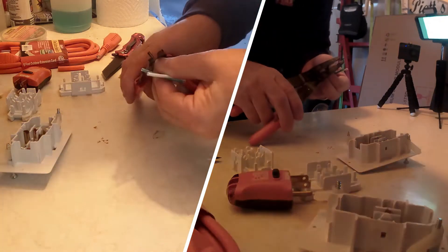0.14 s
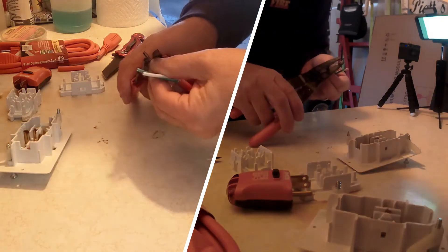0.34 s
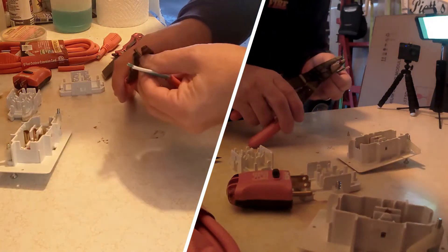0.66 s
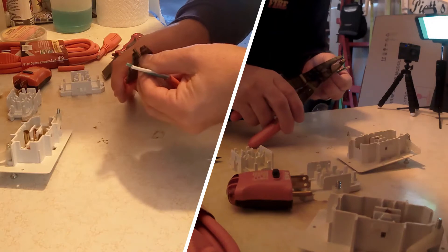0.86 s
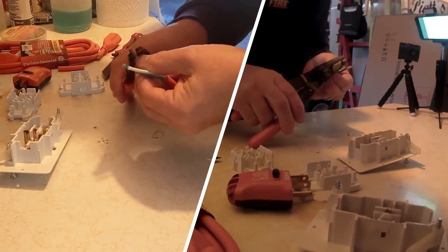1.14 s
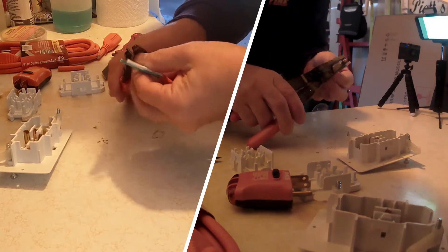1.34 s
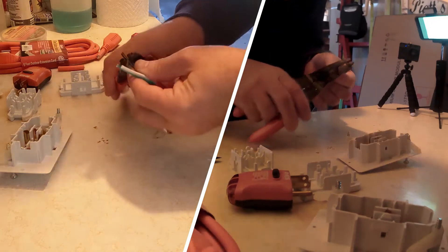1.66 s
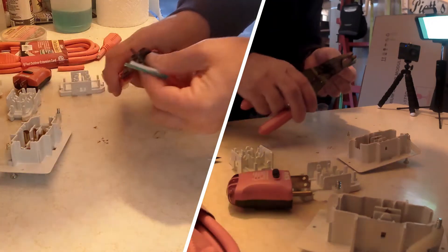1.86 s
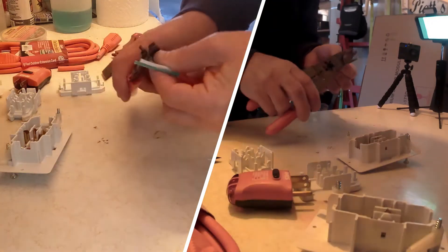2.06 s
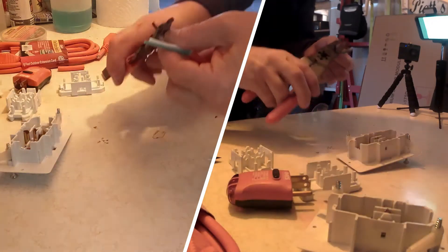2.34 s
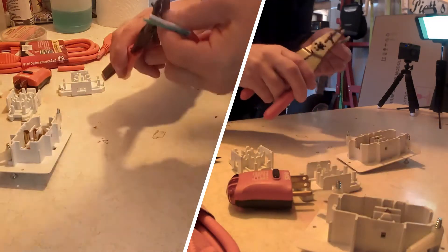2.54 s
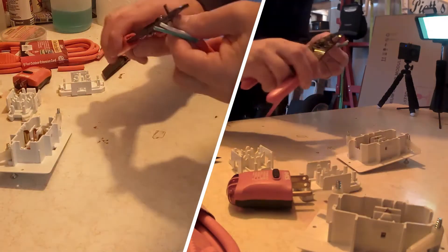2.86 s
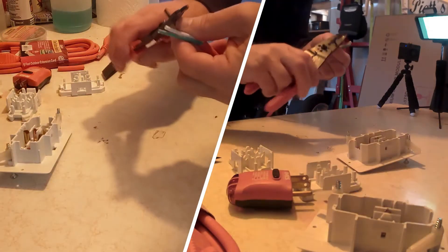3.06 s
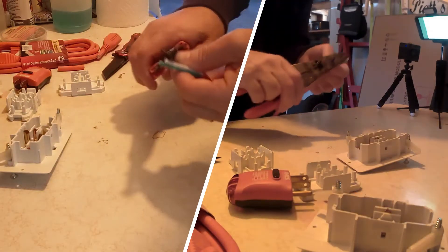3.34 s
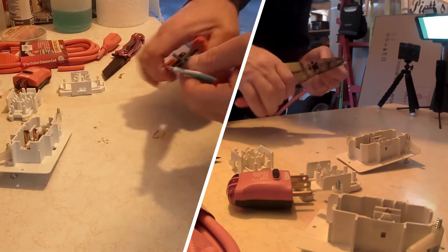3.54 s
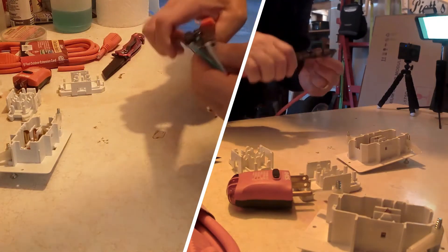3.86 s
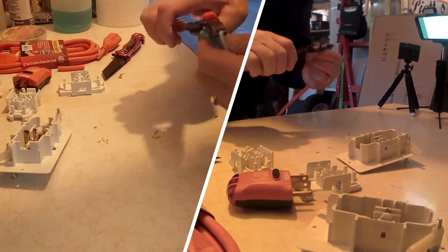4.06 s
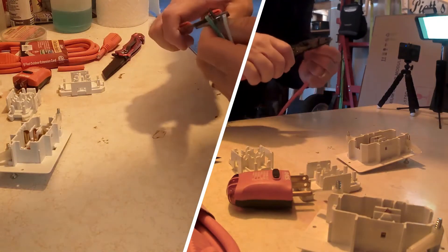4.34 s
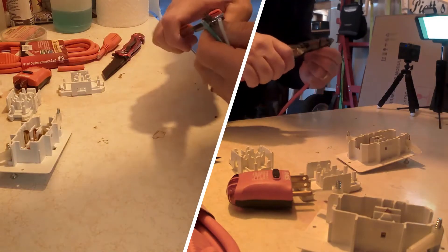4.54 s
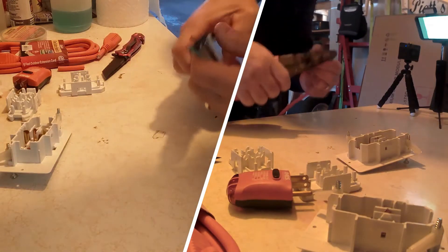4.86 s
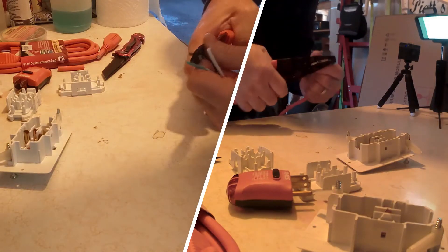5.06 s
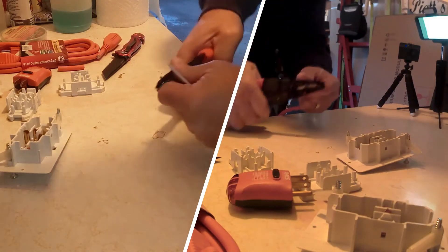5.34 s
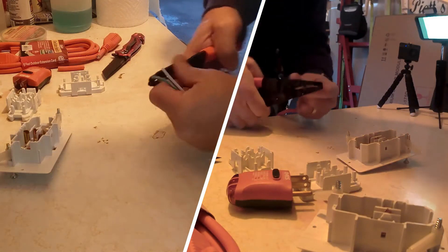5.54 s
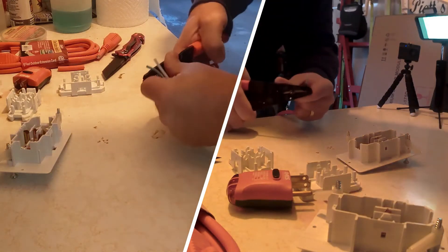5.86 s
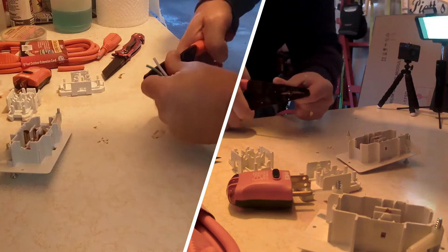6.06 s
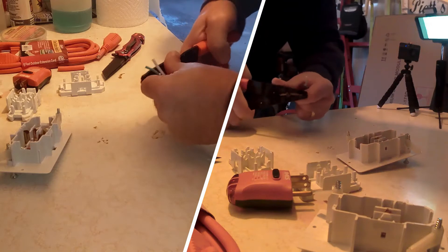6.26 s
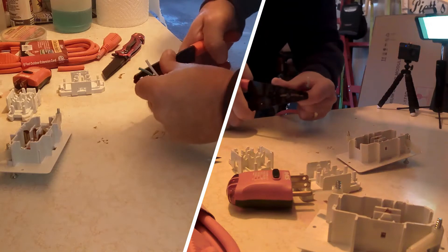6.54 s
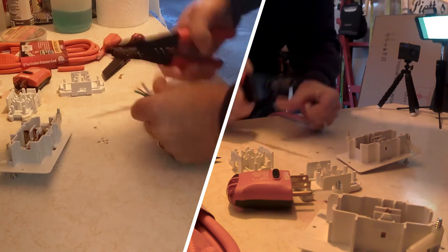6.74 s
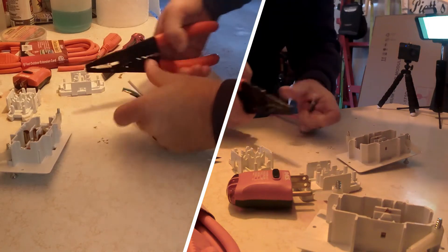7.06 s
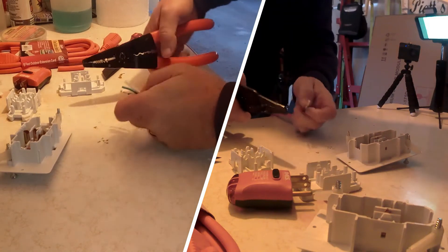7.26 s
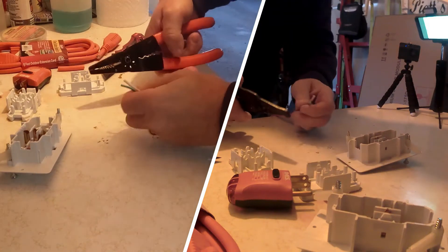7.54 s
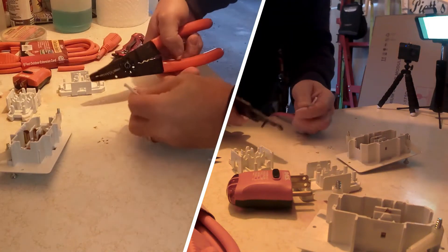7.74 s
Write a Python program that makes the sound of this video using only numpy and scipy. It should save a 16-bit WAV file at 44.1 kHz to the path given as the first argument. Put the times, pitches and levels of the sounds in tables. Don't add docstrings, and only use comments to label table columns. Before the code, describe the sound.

A small, quiet indoor room heard close in stereo, with faint hiss and a low wavering appliance hum. A tiny pivot squeak opens; a counter knock comes at 0.5 seconds, then a light tick and rub, with another knock at 1.6. Soft hollow plastic bumps sound at 2.1 and 2.3, followed by dragging sleeve rubs. Around 3.2-3.9 steel ticks mix with stronger rubbing and thin insulation hiss. From 4.5 to 4.9 the jaws bite in a quick gritty series, brighter near the end. A rub at 5.1 leads into stuttering low cable creaks and faint strand flicks until a snip at 5.7. At 6.4 two very sharp metallic snips crack close together. A brief scuff leads to a heavy, booming counter knock at 6.9, with loose parts chattering and hum swelling. Small clinks, knocks and sliding hiss fade before a last pinging snip at 7.8.

```python
import sys
import numpy as np
from scipy import signal
from scipy.fft import rfft, irfft
from scipy.io import wavfile
from scipy.ndimage import uniform_filter1d

SR = 44100
rng = np.random.default_rng(int(sys.argv[2]) if len(sys.argv) > 2 else 0)


def unload_audio(sound):
    columns = np.transpose(np.atleast_2d(sound))
    steps = np.round(np.clip(columns, -1, 1) * 32767)
    wavfile.write(sys.argv[1], SR, steps.astype(np.int16))


def linear_from_db(decibels):
    return 10 ** (np.asarray(decibels, float) / 20)


N = 348654

# start in seconds, steel peak level in dB, crack in dB above it,
# knock through the handle in dB above it, shake in seconds.
SNIPS = [
    (5.6665, -43, -10, -20, .003),
    (6.2995, -70, 5, 17, .002),
    (6.3735, -59, 20, 13, 0.0018),
    (6.3804, -36, 10.5, 3.5, .003),
    (6.413, -35, 9, -10, .002),
    (7.767, -45.5, -8, -20, .002),
]
# frequency in Hz, level in dB, t60 in seconds.
HANDLE = [(673, -1, 0.028), (1280, -5, 0.041), (1400, -7.5, .08), (2073, -9, 0.027)]
# frequency in Hz, level in dB, t60 in seconds.
STEEL = [(2678, 1, 0.023), (3256, -4, .035), (3700, -3, 0.029), (4480, -1.5, 0.033), (5330, -6, .025),
         (6100, 0, 0.025), (6900, -7, .03), (8330, -11, 0.016), (9670, -8, .025), (10270, -4, .025),
         (11200, -9, .025), (12880, -9, .02), (13940, -10, .02)]
# start in seconds, peak level in dB, frequency in Hz, t60 in seconds.
PINGS = [
    (5.667, -41.5, 3500, 0.016),
    (7.7665, -35.5, 3800, 0.01),
    (4.866, -46.5, 9800, .015),
]
# start in seconds, body peak level in dB, body frequency in Hz,
# bright band in dB above the body.
TICKS = [(0.658, -55, 2310, -23), (1.479, -50.5, 2390, -7), (1.836, -51.5, 5370, 9),
         (3.261, -52.5, 2550, -13), (3.628, -56.5, 2320, 15), (3.844, -51.5, 3070, -13),
         (3.868, -51.5, 2540, -23), (5.6658, -43, 3500, -8), (6.373, -53, 3400, -24),
         (6.381, -32.5, 2770, -2), (6.4138, -35.5, 2740, 7), (6.4614, -57, 4680, -5),
         (6.6147, -53.5, 3160, 2), (6.939, -43, 2370, -21), (7.7666, -41, 3900, -14), (7.88, -56, 5560, 13)]
# as for the ticks, in seconds, dB, Hz and dB.
CLINKS = [(1.5318, -56, 2380, -1), (2.33, -51, 6100, -5), (4.071, -53, 2550, -6), (4.6837, -48, 2550, -11),
          (4.71, -48, 4340, -9), (5.7255, -55, 2200, -20), (6.84, -59, 4580, -23), (6.882, -47, 4200, -8),
          (7.206, -57, 2280, 0), (7.2432, -55.5, 4470, -9), (7.395, -51, 3940, -4)]
# start in seconds, body peak level in dB, body frequency in Hz.
BITES = [(4.489, -57, 5330), (4.508, -59, 6500), (4.5306, -54.5, 2620), (4.566, -54, 5920),
         (4.583, -55, 4800), (4.601, -51, 2600), (4.635, -55, 4460), (4.666, -54, 2820), (4.69, -49, 2600),
         (4.722, -57, 2500), (4.732, -44, 2310), (4.7674, -44, 2580), (4.799, -52, 2700),
         (4.805, -49.5, 4330), (4.822, -52, 4700), (4.846, -50.5, 6190), (4.865, -47, 2600)]
# start in seconds, body peak level in dB.
FLICKS = [
    (5.3694, -66),
    (5.3902, -59.5),
    (5.4157, -56.5),
    (5.4346, -56),
    (5.4605, -56.5),
]
# frequency in Hz, level in dB, t60 in seconds.
SQUEAK = [(860, 4, 0.033), (2740, -8.5, 0.052), (4280, -14, .06)]
# frequency in Hz, width in Hz, level in dB.
SCUFF = [(194, 51, 13), (598, 100, 5), (1421, 120, 2), (1680, 120, 2), (3000, 600, -0.5), (4150, 270, -5),
         (6000, 500, -14), (9150, 3800, -8)]
# start in seconds, board peak level in dB, then cabinet, panel and edge
# in dB above the board.
KNOCKS = [(0.462, -39.5, -5, -8.5, -22), (0.658, -60, 6.5, -21, -9), (1.48, -54, 0, 0, -12),
          (1.613, -43, -2.5, -4, -22), (3.231, -50.5, -13, -5, 2), (5.725, -55, -7, -19, 3),
          (5.831, -69, 17, -16, -11), (6.382, -46, 0.5, -7, 2), (6.413, -42, -12, -11, -6),
          (6.881, -43.5, -13, 5, -0.5), (6.9387, -23.5, 1, -7, -17), (7.157, -60.5, 18.5, -10, -22),
          (7.271, -66, 15, -18, -3), (7.39, -55.5, 4, -14, -6)]
# frequency in Hz, level in dB, t60 in seconds.
CABINET = [(39.84, -7.5, 1), (71.8, 5.5, 0.26), (46.6, -1.5, 0.45)]
PANEL = [(112.7, 1.5, 0.3), (140.8, -9.5, 0.71), (182, 0, 0.31), (234.5, -9.5, 0.21)]
BOARD = [(278, -1.5, 0.16), (328, 3, 0.097), (426, -9, 0.19), (580, -6, 0.023), (692, 7.5, 0.047),
         (765, 4.5, 0.056), (820, -2.5, 0.06), (1030, -42, 0.016)]
EDGE = [(1120, 26, 0.077), (1354, 25.5, 0.068), (1690, 13, 0.06), (2100, -16, 0.03), (2320, 5, 0.16),
        (2700, -36, 0.021)]
# frequency in Hz, level in dB, t60 in seconds.
HEAVY_BOARD = [(223, -8, 0.071), (286, -1, 0.073), (350, -3, 0.076), (454, -10.5, 0.11), (529, -6.5, 0.07),
               (667, 0.5, 0.051), (803, -1, 0.053), (885, 0.5, 0.05), (1067, 0, 0.04), (1180, -13, 0.04),
               (1420, -12, 0.04)]
HEAVY_PANEL = [(114.9, 3, 0.29), (139.4, -6.5, 0.6), (180.7, -4, 0.29)]
# start in seconds, peak level in dB, low modes in dB above it.
BUMPS = [
    (2.096, -37, -2),
    (2.33, -42.5, 0.5),
    (4.416, -50, 8.5),
]
# frequency in Hz, level in dB, t60 in seconds.
HOLLOW_LOW = [(115.5, -5, 0.5), (138.7, 2.5, 0.39), (190.3, -3, 0.77)]
HOLLOW = [(269, -6.5, 0.37), (360.2, 5, 0.28), (526, 3, 0.19), (608, 4, 0.21), (666, -1.5, 0.25),
          (790, -10.5, 0.41), (942, -5.5, 0.2), (1210, -38, 0.19), (1450, -16, 0.08), (1740, -14, .09),
          (1980, -11, 0.056)]
# start in seconds, peak level in dB.
CHATTER = [
    (6.959, -41),
    (6.982, -45),
    (7.003, -45.5),
    (7.024, -46),
    (7.046, -48),
    (7.107, -56),
    (7.127, -57.5),
]
# frequency in Hz, width in Hz, level in dB.
LOOSE = [(890, 390, 15.5), (2280, 570, 6.5), (3880, 500, 0.5), (4950, 510, 3), (9000, 7500, -10)]
# middle in seconds, length in seconds, board level in dB,
# then edge and panel in dB above it.
STROKES = [(0.663, 0.24, -64.5, 0.5, -17), (2.496, 0.17, -70, -10, 7.5), (2.735, 0.2, -55, -13, -2),
           (2.982, 0.29, -58.5, -12, 3.5), (3.18, 0.31, -67, -19, 0.5), (3.519, 0.59, -50, 3, -13.5),
           (3.862, 0.1, -64, 0.5, -15), (4.324, 0.21, -66, 2.5, -6), (4.16, .25, -68.5, -8, 6.5),
           (5.059, .24, -49.5, -3.5, -16), (5.098, .1, -60.5, 9, -15), (5.333, 0.44, -59.5, -3, 1),
           (5.766, 0.078, -65, -5, -12), (5.902, 0.28, -59, 2, -5), (6.573, 0.18, -66.5, 3.5, -4),
           (7.105, 0.25, -75, -7, 19)]
# start in seconds, t60 in seconds, board level in dB,
# then edge and panel in dB above it.
SETTLES = [
    (0.52, 0.47, -68, 4.5, 10.5),
    (6.44, 0.24, -71, -4, 16),
    (6.99, 0.56, -47, -4, 4),
]
# frequency in Hz, width in Hz, level in dB.
RUB_PEAKS = [(335, 12, -5.5), (472, 65, -2), (580, 48, 1), (675, 170, 4), (898, 84, 2), (1119, 45, 5.5),
             (1407, 63, 0), (1663, 82, 1), (2030, 43, -2.5), (2310, 50, -15), (2760, 40, -18),
             (3150, 64, -7), (3440, 88, -9), (4090, 60, -24)]
# start in seconds, t60 in seconds, body level in dB,
# bright band in dB above it.
SLIDES = [(1.735, 0.64, -77, 7), (2.33, 0.48, -58.5, -22), (3.56, 2.6, -73, -3), (3.626, 0.9, -67, 2.5),
          (3.8, 0.17, -61.5, 4.5), (4.688, 0.44, -73, 1), (4.87, 0.038, -81, 20), (5.744, 0.27, -71, 2),
          (6.43, 0.55, -65, -5), (6.9, .08, -66, 2), (6.968, 0.27, -57.5, -3), (7.397, 0.53, -58.5, -17)]
# start in seconds, peak level in dB, frequency in Hz.
CREAK = [(5.189, -35.5, 580), (5.207, -38, 487), (5.224, -36.5, 563), (5.238, -39, 575), (5.248, -36, 580),
         (5.264, -38, 540), (5.293, -55, 553), (5.306, -41, 555), (5.319, -38, 514), (5.328, -47, 479),
         (5.392, -38.5, 581), (5.414, -37, 443), (5.455, -40, 608), (5.564, -42, 550), (5.646, -50, 530),
         (6.3005, -35.5, 624), (6.315, -41, 524), (7.038, -27, 410), (7.19, -40.5, 430)]
# time in seconds, level in dB.
HUM = [(0.0, -54), (0.68, -50), (0.88, -48.5), (1.4, -50.5), (1.82, -52.5), (2.24, -51), (2.9, -54.5),
       (3.02, -53), (3.3, -54), (4.55, -54), (4.8, -50.5), (4.9, -56), (6.2, -52), (6.51, -48),
       (6.6, -51.5), (6.91, -55), (7.02, -41.5), (7.55, -53.5)]
# time in seconds, depth in dB.
HUM_DIPS = [(0.0, 13), (0.75, 17), (1.01, 16), (1.27, 26), (1.47, 2), (1.69, 3), (1.89, 7), (2.11, 15),
            (2.62, 1), (3.14, 12), (4.21, 2), (5.52, 4), (6.09, 5), (6.29, 14), (6.41, 12), (6.71, -1),
            (6.95, 18), (7.22, 4)]
# frequency in Hz, density in dB per Hz.
AIR = [(20, -14), (32, -9), (60, -13.5), (88, -14.5), (127, -19.5), (150, -23.5), (187, -20), (262, -29.5),
       (1120, -30), (1370, -33), (5800, -40), (7400, -46.5), (10500, -42), (15600, -46.5)]

TICK_T60_S, CLINK_T60_S, BITE_T60_S = 0.043, 0.12, 0.046
TICK_STEEL_DB, CLINK_STEEL_DB, BITE_STEEL_DB = -6, -4.5, -5.5
COPPER_S = 4.75
INSULATION_BRIGHT_DB, COPPER_BRIGHT_DB = -19, -1
FLICK_HZ, FLICK_BRIGHT_DB = 2900, 12.5
CRACK_S, SOFT_RISE_S, SLIP_ATTACK_S = .00012, 0.0005, 0.012
SCUFF_S, SCUFF_SWELL_S, SCUFF_FADE_S, SCUFF_DB = 6.8755, 0.0087, .009, -43
SQUEAK_S, SQUEAK_DB = .0225, -49
HEAVY_FROM_DB, THUD_DB, HEAVY_THUD_DB, KNUCKLE_DB = -30, 19, 15.5, -3.5
THUD_DROP_PER_DB = .012
BOARD_LAW, EDGE_LAW, PANEL_LAW = 1.6, 2.65, 1.04
DRONE_S, DRONE_LENGTH_S, DRONE_HZ, DRONE_WIDTH_HZ, DRONE_DB = 5.37, .36, 335, 28, -59
HUM_HZ, HUM_OCTAVE_DB, DIP_S = 59.23, -66.5, 0.074
AIR_DB = -57
HANDS_PAN_DB, COUNTER_PAN_DB = 1.5, 2.5
PORT_LAG_S, NEAR_LAG_S = 0.00037, -.00012
ROOM_T60_S, ROOM_DB = 0.3, -12
TOP_HZ = 15800


def level(x, db):
    return x * linear_from_db(db) / np.sqrt(np.mean(x ** 2))


def band(x, lo_hz, hi_hz, order=2):
    return signal.sosfilt(signal.butter(order, [lo_hz, min(hi_hz, .48 * SR)], "band", fs=SR, output="sos"), x)


def seconds(length_s):
    return np.arange(int(length_s * SR)) / SR


def decay(t, t60):
    return np.exp(-np.log(1000) * t / t60)


def walk(rate):
    k = int(SR / rate)
    held = np.repeat(rng.standard_normal(N // k + 1), k)
    return 1.69 * uniform_filter1d(uniform_filter1d(held, k), k)[:N]


def sides(pan_db):
    return linear_from_db([[pan_db / 2], [-pan_db / 2]])


def ports(x, pan_db, lag_s):
    at, half = np.arange(len(x)), lag_s * SR / 2
    return np.array([np.interp(at - half, at, x), np.interp(at + half, at, x)]) * sides(pan_db)


def add(out, x, s):
    i = int((s + .0015) * SR)
    out[:, i:i + x.shape[1]] += x[:, :N - i]


def ring(modes, push_s, spread=0.99):
    hz, db, t60 = np.transpose(modes)[:, :, None]
    t = seconds(t60.max())
    spot_level, spot_pitch, spot_phase = rng.standard_normal((3, len(modes), 1))
    size = linear_from_db(db + 1.5 * spot_level) * decay(t, t60) * np.minimum(t / push_s, 1)
    turn = spread * (np.pi * hz * PORT_LAG_S + np.minimum(hz / 1500, 1) * .4 * spot_phase)
    phase = 2 * np.pi * hz * (1 + 0.0071 * spot_pitch) * t + 1.0
    x = -np.array([(size * np.sin(phase - turn)).sum(0), (size * np.sin(phase + turn)).sum(0)])
    return x / np.abs(x.mean(0)).max()


def resonate(x, peaks):
    parts = [linear_from_db(db) * band(x, hz - w / 2, hz + w / 2, order=1) / np.sqrt(w) for hz, w, db in peaks]
    return level(sum(parts), 0)


def steel(shake_s):
    t = seconds(.03)
    shake = rng.standard_normal(len(t)) ** 3 * np.exp(-t / shake_s)
    x = signal.fftconvolve(ring(STEEL, .0001), shake[None], axes=1)
    return x / np.abs(x.mean(0)).max()


def snips():
    out, t, pan = np.zeros((2, N)), seconds(.06), sides(HANDS_PAN_DB)
    for s, db, crack_db, knock_db, shake_s in SNIPS:
        u = t[:200] / CRACK_S - 2
        add(out, pan * linear_from_db(db + crack_db) * (.4 - 2 * u) * np.exp(-u ** 2), s)
        add(out, pan * linear_from_db(db) * steel(shake_s), s)
        add(out, pan * linear_from_db(db + knock_db) * ring(HANDLE, 0.00028), s)
    for s, db, hz, t60 in PINGS:
        add(out, pan * linear_from_db(db - 60 * t / t60) * np.sin(2 * np.pi * hz * t), s)
    return out


def ticks():
    out, t = np.zeros((2, N)), seconds(.15)
    rise = np.minimum(t / SOFT_RISE_S, 1)
    rows = [(*r, TICK_T60_S, TICK_STEEL_DB) for r in TICKS]
    rows += [(*r, CLINK_T60_S, CLINK_STEEL_DB) for r in CLINKS]
    for s, db, hz in BITES:
        bright_db = COPPER_BRIGHT_DB if s > COPPER_S else INSULATION_BRIGHT_DB
        rows.append((s, db, hz, bright_db, BITE_T60_S, BITE_STEEL_DB))
    rows += [(*r, FLICK_HZ, FLICK_BRIGHT_DB, BITE_T60_S, BITE_STEEL_DB) for r in FLICKS]
    for s, db, body_hz, bright_db, t60, steel_db in rows:
        rattle = rng.standard_normal((2, 2, len(t))) * decay(t, t60) * rise
        wide = band(rattle[0], 840, 7000, order=1)
        x = linear_from_db(6.0) * wide + linear_from_db(10.5) * band(wide, body_hz, body_hz * 1.03, order=1)
        x += linear_from_db(bright_db - 0.5) * band(rattle[1], 8400, 14000)
        add(out, steel(0.0018) * linear_from_db(db + steel_db), s)
        add(out, x * linear_from_db(db - 5.0) * sides(HANDS_PAN_DB), s)
    return out


def squeak_and_scuff():
    out, t = np.zeros((2, N)), seconds(.06)
    fade = np.exp(-(t - SCUFF_SWELL_S).clip(0) / SCUFF_FADE_S)
    swell = np.minimum(t / SCUFF_SWELL_S, 1) ** 2 * fade
    scuff = resonate(rng.standard_normal(len(t)) * swell, SCUFF)
    add(out, ports(scuff * linear_from_db(SCUFF_DB), 6.0, NEAR_LAG_S), SCUFF_S)
    add(out, linear_from_db(SQUEAK_DB) * ring(SQUEAK, .003), SQUEAK_S)
    return out


def knocks():
    out, t = np.zeros((2, N)), seconds(.1)
    for s, db, cabinet_db, panel_db, edge_db in KNOCKS:
        heavy = db > HEAVY_FROM_DB
        gain = linear_from_db(db) * sides(COUNTER_PAN_DB)
        add(out, gain * linear_from_db(cabinet_db + 9.5) * ring(CABINET, 0.002), s)
        add(out, gain * linear_from_db(panel_db + 11.5) * ring(HEAVY_PANEL if heavy else PANEL, 0.00075), s)
        add(out, gain * linear_from_db(2.0) * ring(HEAVY_BOARD if heavy else BOARD, 0.0012, spread=.8), s)
        add(out, gain * linear_from_db(edge_db - 1.0) * ring(EDGE, 0.0016), s)
        push = rng.standard_normal((2, len(t))) * np.exp(-t / .006)
        push[:, 1] -= 3.
        deep = np.exp(-THUD_DROP_PER_DB * (db + 48.5))
        thud = linear_from_db(HEAVY_THUD_DB if heavy else THUD_DB) * band(push[0], 270 * deep, 700 * deep)
        thud += linear_from_db(edge_db + 14.5) * band(push[1], 1550, 2160)
        knuckle = rng.standard_normal(len(t)) * np.exp(-t / 0.0027)
        thud += linear_from_db(KNUCKLE_DB) * band(knuckle, 1200, 3060)
        add(out, gain * ports(thud, 0, NEAR_LAG_S), s)
    return out


def bumps():
    out, t = np.zeros((2, N)), seconds(.1)
    for s, db, low_db in BUMPS:
        add(out, linear_from_db(db) * ring(HOLLOW, 0.0045) * sides(2.6), s)
        add(out, linear_from_db(db + low_db) * ring(HOLLOW_LOW, 0.0007) * sides(2.6), s)
        scuff = band(rng.standard_normal(len(t)) * t / 0.0025 * np.exp(1 - t / 0.0078), 270, 1070)
        add(out, ports(scuff * linear_from_db(db - 6.5), 1.8, NEAR_LAG_S), s)
    return out


def chatter():
    out, t = np.zeros((2, N)), seconds(.08)
    for s, db in CHATTER:
        shake = rng.standard_normal((2, len(t))) * t / 0.0028 * np.exp(1 - t / 0.0039)
        x = sum(linear_from_db(peak_db) * band(shake, hz - w / 2, hz + w / 2) for hz, w, peak_db in LOOSE)
        add(out, x * linear_from_db(db) * sides(6), s)
    return out


def grit(rate, spread_db):
    slips = (rng.random(N) < rate / SR) * rng.standard_normal(N) * linear_from_db(spread_db * rng.exponential(size=N))
    return level(slips, -9.5) + level(rng.standard_normal(N), -8.5)


def stroke(s, length_s):
    return np.cos(np.pi * np.clip((np.arange(N) / SR - s) / length_s, -.5, .5)).clip(0)


def slip(s, t60):
    t = np.arange(N) / SR - s
    return np.clip(1 + t / SLIP_ATTACK_S, 0, 1) ** 2 * decay(t.clip(0), t60)


def rub():
    drag = grit(2500, 1.5) * linear_from_db(.8 * walk(45))
    rung = resonate(drag, RUB_PEAKS) + level(band(drag, 360, 2400, order=1), -18.0)
    housing = resonate(drag, [(hz, 3.8 / t60, db) for hz, db, t60 in HOLLOW])
    board, edge, panel = np.zeros((3, N))
    for s, t60, db, edge_db, panel_db in SETTLES:
        fade = linear_from_db(db) * slip(s, t60)
        board += fade
        edge += linear_from_db(edge_db) * fade
        panel += linear_from_db(panel_db) * fade
    for s, length_s, db, edge_db, panel_db in STROKES:
        speed = stroke(s, length_s)
        board += linear_from_db(db) * speed ** BOARD_LAW
        edge += linear_from_db(db + edge_db) * speed ** EDGE_LAW
        panel += linear_from_db(db + panel_db) * speed ** PANEL_LAW
    pushed = np.abs(np.arange(N) / SR - 2.83) < .4
    surface = board * np.where(pushed, housing, level(band(rung, 300, 1150), 0))
    surface += edge * level(band(rung, 900, 4500), 0)
    drone = panel * resonate(drag, [(hz, 9, db) for hz, db, _ in HOLLOW_LOW])
    cable = resonate(drag, [(DRONE_HZ, DRONE_WIDTH_HZ, 0)])
    drone += linear_from_db(DRONE_DB) * stroke(DRONE_S, DRONE_LENGTH_S) * cable
    return ports(surface, 5.5, NEAR_LAG_S) + ports(drone, 0.91, -PORT_LAG_S)


def slides():
    slide = grit(3000, 2.0) * linear_from_db(1.2 * walk(60))
    body, bright = np.zeros((2, N))
    for s, t60, db, bright_db in SLIDES:
        fade = linear_from_db(db) * slip(s, t60)
        body += fade
        bright += linear_from_db(bright_db) * fade
    hiss = body * level(band(slide, 3360, 8800), 0) + bright * level(band(slide, 7500, 13100), 0)
    return ports(hiss, 1.0, 0)


def creak():
    out, t = np.zeros((2, N)), seconds(.04)
    for s, db, hz in CREAK:
        fade = t / 0.0018 * np.exp(1 - t / 0.001)
        x = fade * (np.sin(2 * np.pi * hz * t) + linear_from_db(-13.0) * np.sin(2 * np.pi * 2.81 * hz * t))
        add(out, ports(x * linear_from_db(db), 4.2, -0.00042), s)
    return out


def room(near):
    t = seconds(.5)
    tail = band(rng.standard_normal((2, len(t))), 173, 6400, order=1) * decay(t, ROOM_T60_S) * (t > .004)
    tail /= np.sqrt((tail ** 2).sum(1))[:, None]
    return linear_from_db(ROOM_DB) * signal.fftconvolve(near.mean(0)[None], tail, axes=1)[:, :N]


def hum():
    t = np.arange(N) / SR
    phase = 2 * np.pi * np.cumsum(HUM_HZ * (1 + 0.01 * walk(5))) / SR
    dips_db = sum(db * np.clip(1 - np.abs(t - s) / DIP_S, 0, 1) for s, db in HUM_DIPS)
    swell_db = np.interp(t, *np.transpose(HUM)) - dips_db
    octave = linear_from_db(HUM_OCTAVE_DB + 0.39 * walk(7.2)) * np.sin(2 * phase)
    return np.sqrt(2) * ports(np.sin(phase) * linear_from_db(swell_db) + octave, 2.2, -PORT_LAG_S)


def air():
    hz = np.maximum(np.arange(N // 2 + 1) * SR / N, 1)
    colour_hz, colour_db = np.transpose(AIR)
    colour = linear_from_db(np.interp(np.log(hz), np.log(colour_hz), colour_db))
    alike = np.clip(1.05 - hz / 700, .1, .98)
    mid, side = rfft(rng.standard_normal((2, N))) * colour
    mid, side = mid * np.sqrt(1 + alike), side * np.sqrt(1 - alike)
    left, right = irfft(np.array([mid + side, mid - side]), N)
    both = np.array([np.roll(left, -int(PORT_LAG_S * SR)), right])
    return level(both, AIR_DB) * sides(2.4)


def scene():
    near = snips() + ticks() + squeak_and_scuff()
    near += knocks() + bumps() + chatter() + rub() + slides() + creak()
    return near + room(near) + hum() + air()


def band_limit(x):
    return signal.sosfilt(signal.butter(12, 16650, fs=SR, output="sos"), x)


def record(dry):
    top = signal.ellip(8, .2, 40, TOP_HZ, fs=SR, output="sos")
    mix = signal.sosfilt(top, np.tanh(2.2 * dry) / 2.152)
    return band_limit(mix)


dry = scene()
out = record(dry)
unload_audio(out)
```